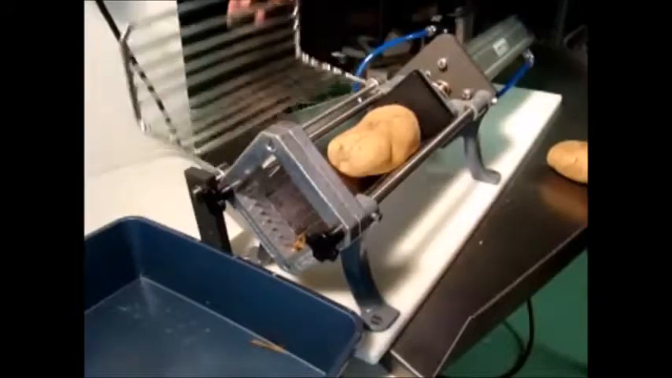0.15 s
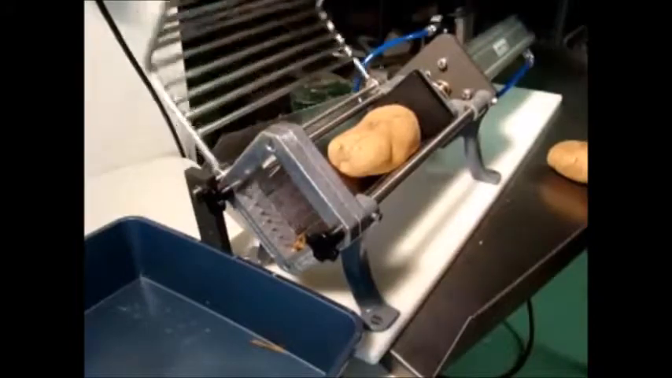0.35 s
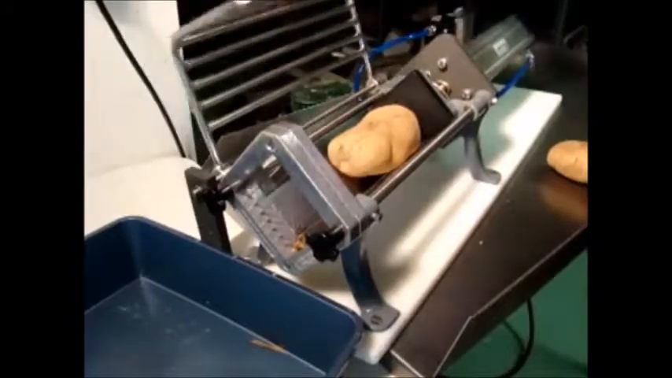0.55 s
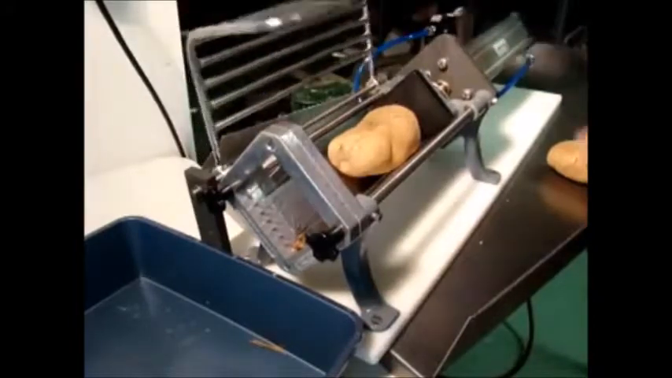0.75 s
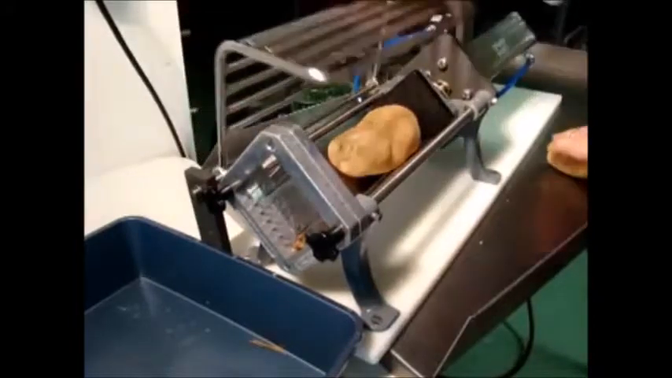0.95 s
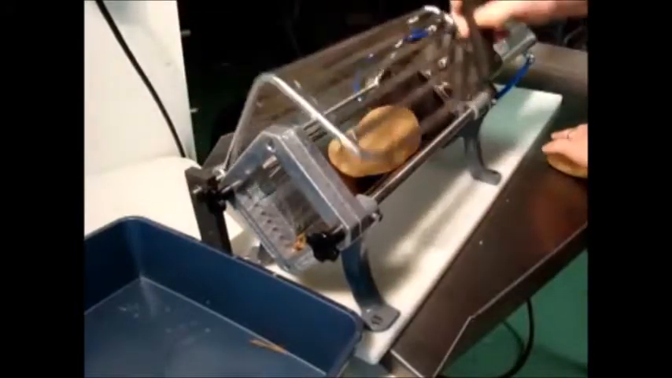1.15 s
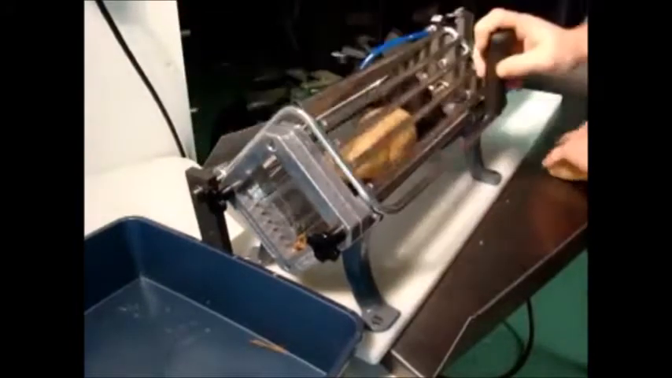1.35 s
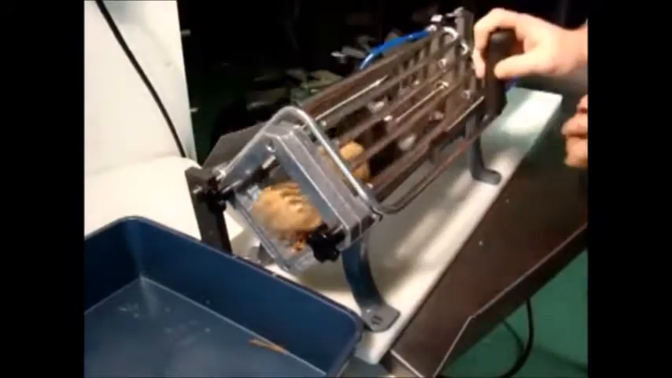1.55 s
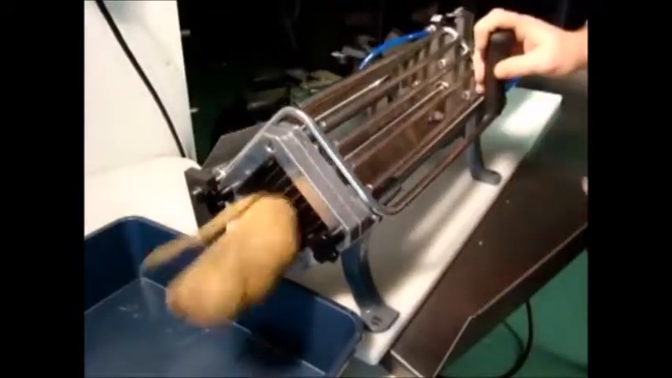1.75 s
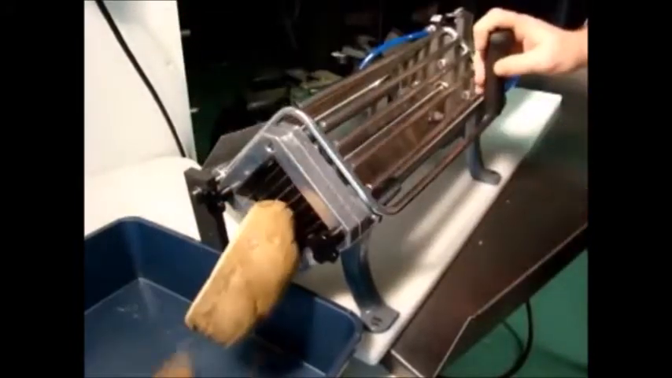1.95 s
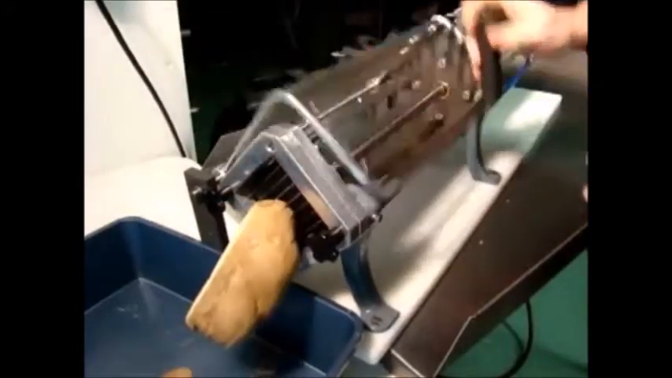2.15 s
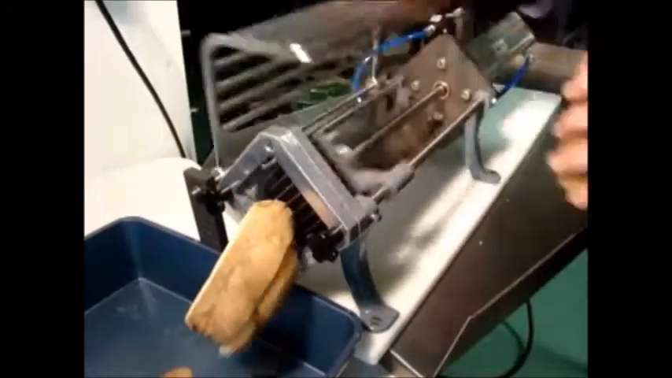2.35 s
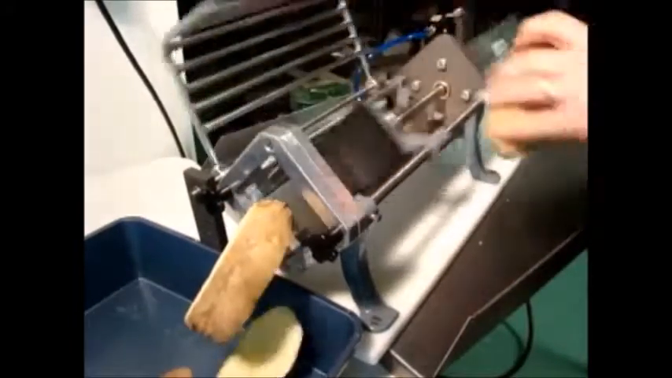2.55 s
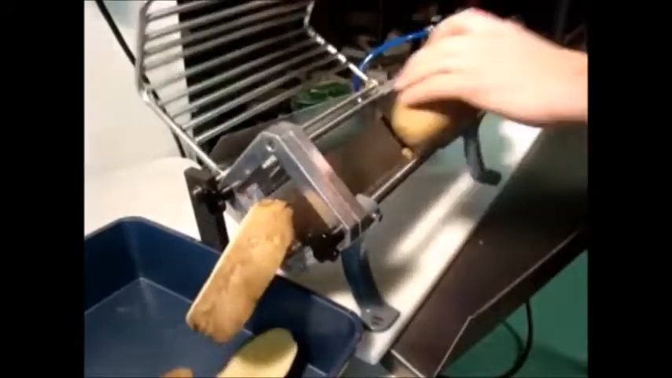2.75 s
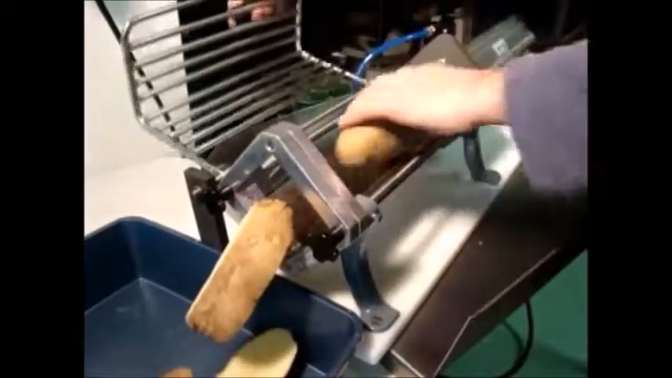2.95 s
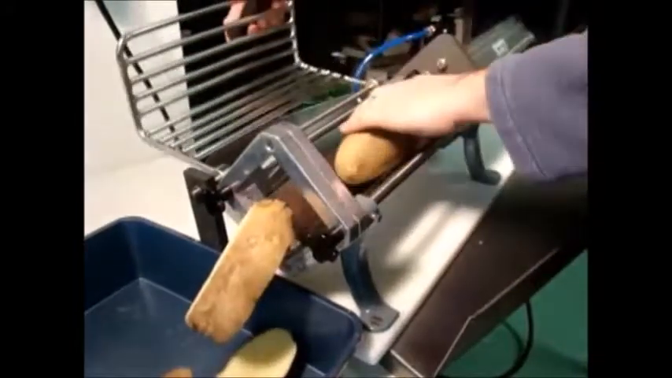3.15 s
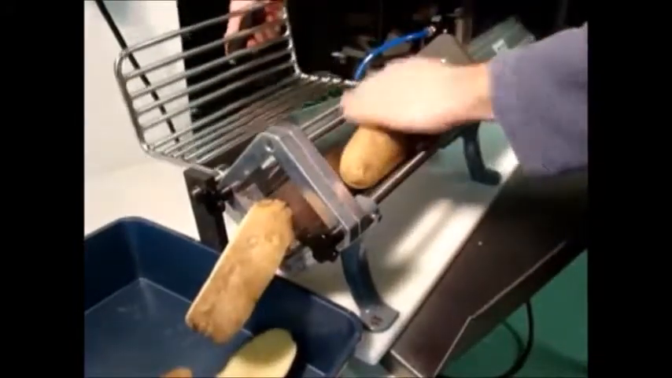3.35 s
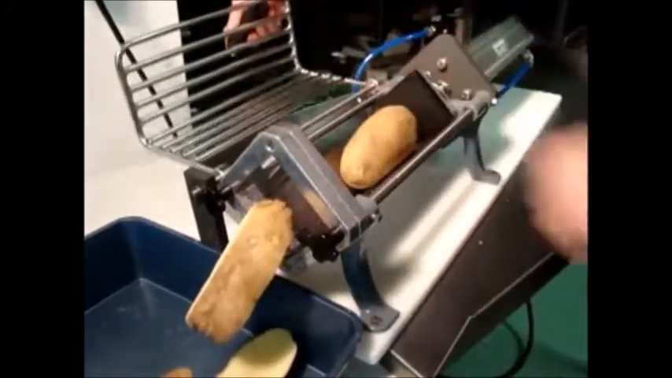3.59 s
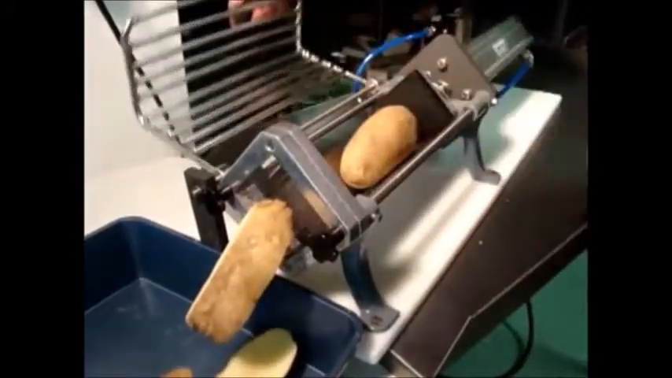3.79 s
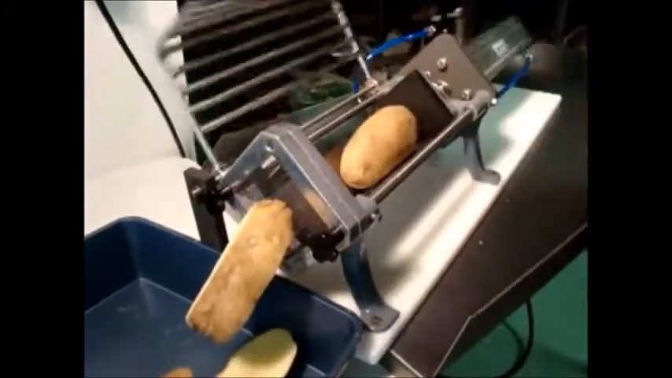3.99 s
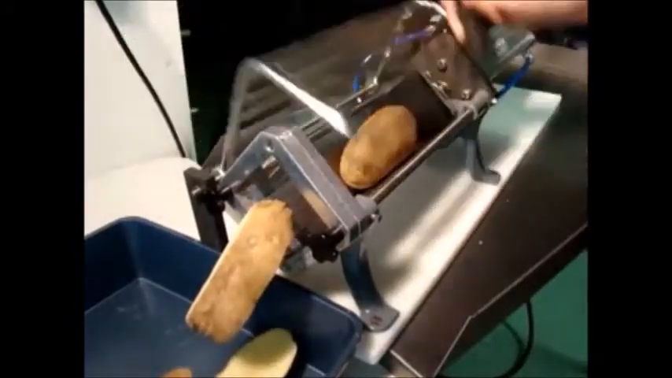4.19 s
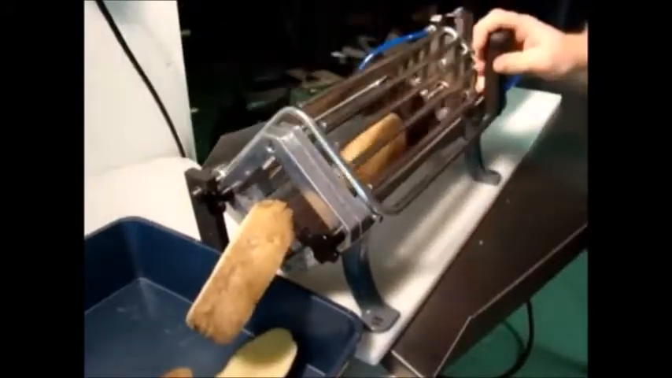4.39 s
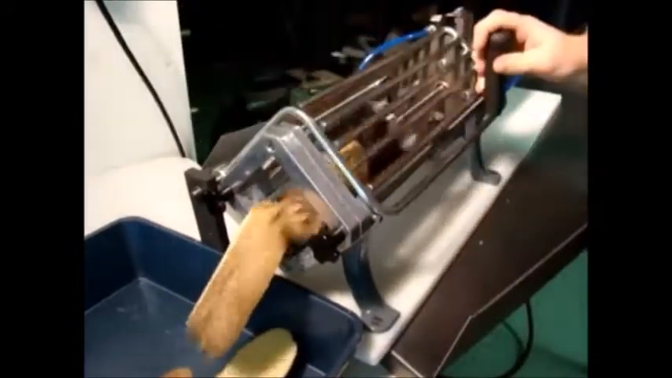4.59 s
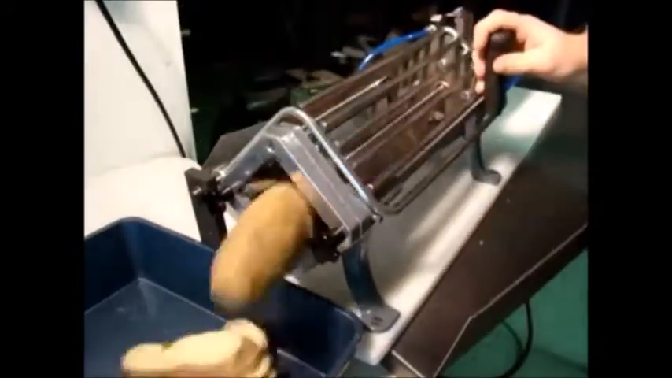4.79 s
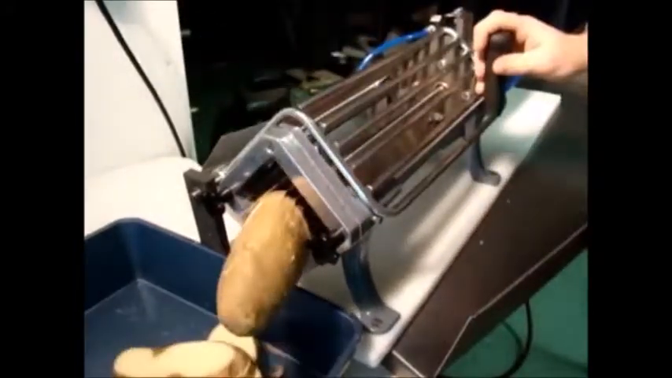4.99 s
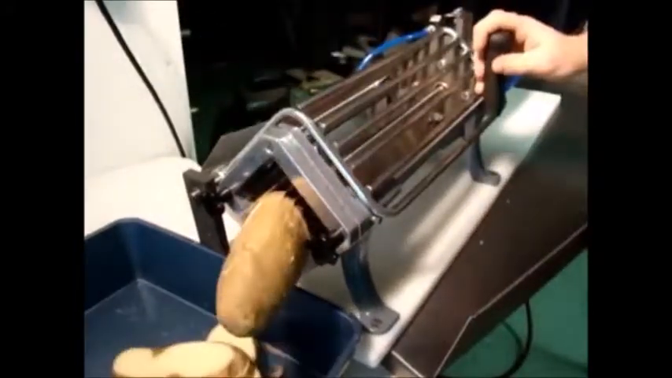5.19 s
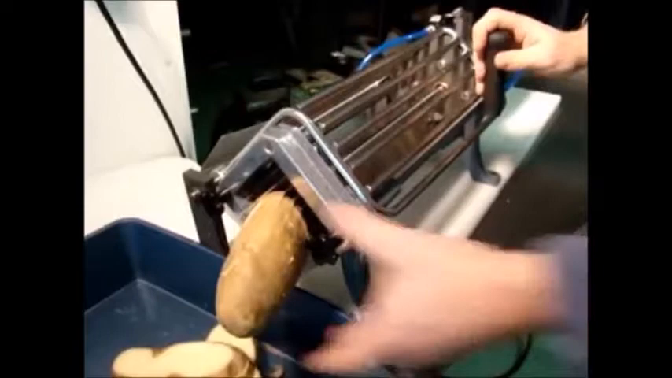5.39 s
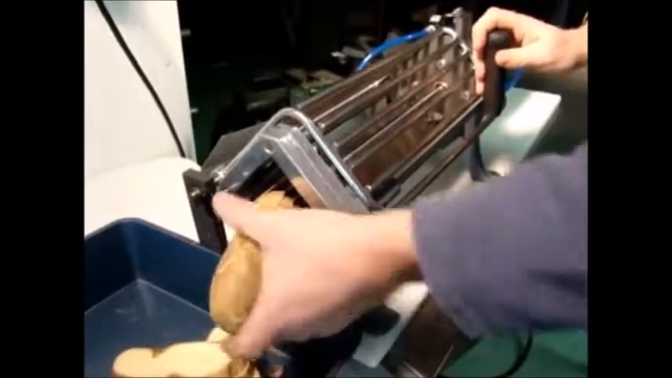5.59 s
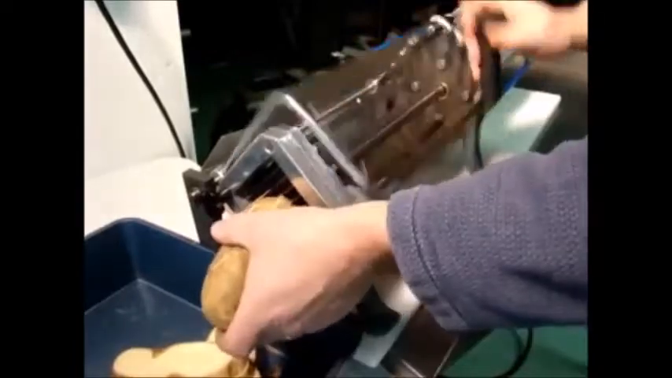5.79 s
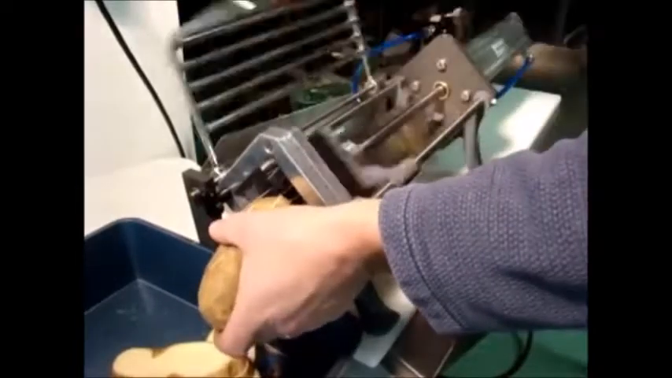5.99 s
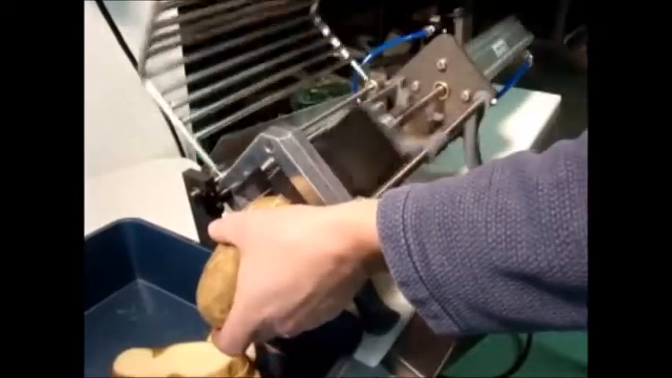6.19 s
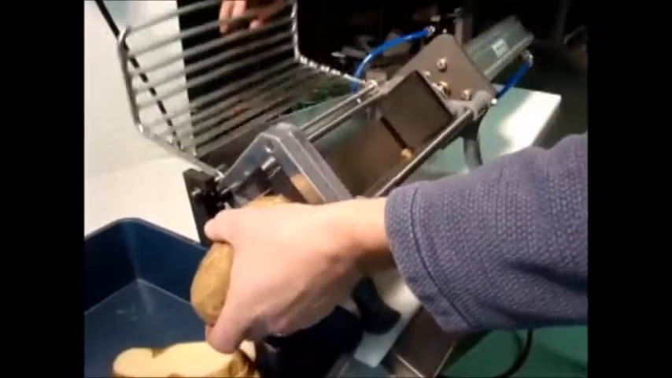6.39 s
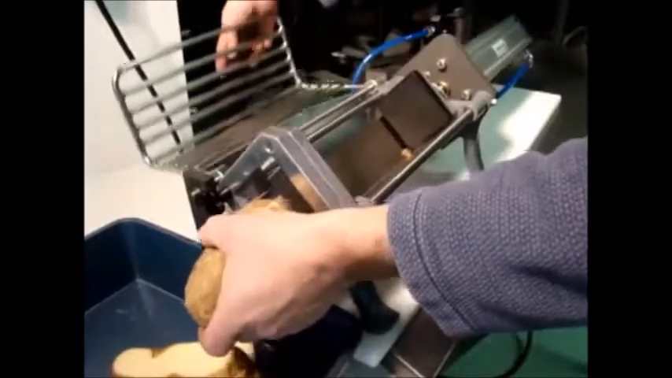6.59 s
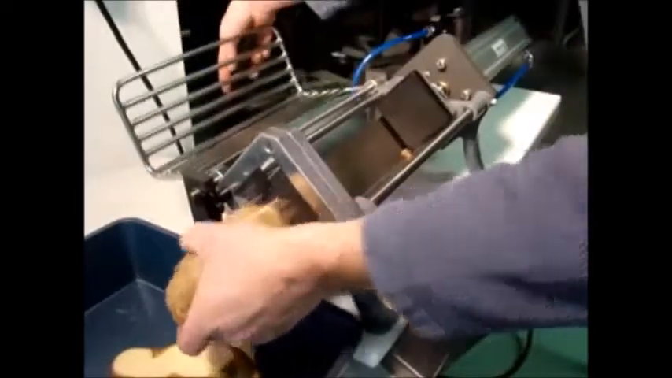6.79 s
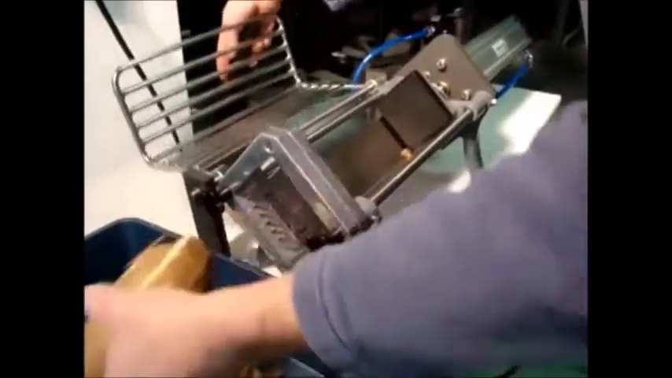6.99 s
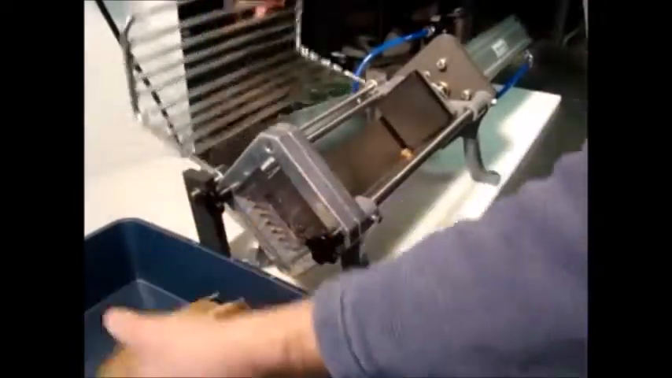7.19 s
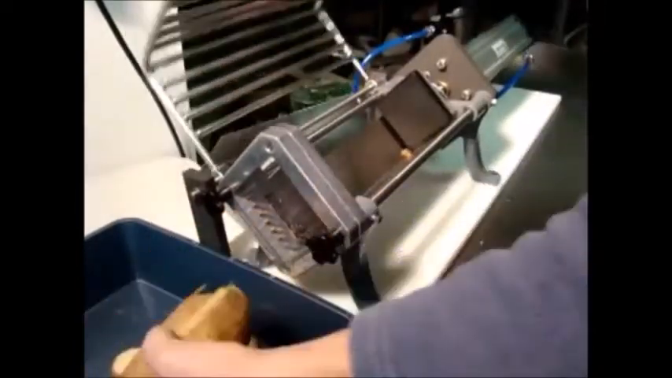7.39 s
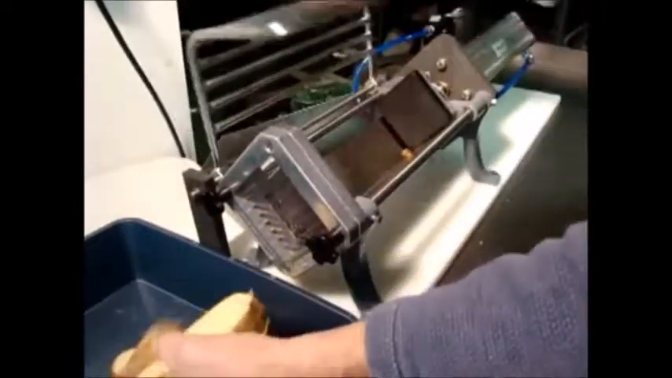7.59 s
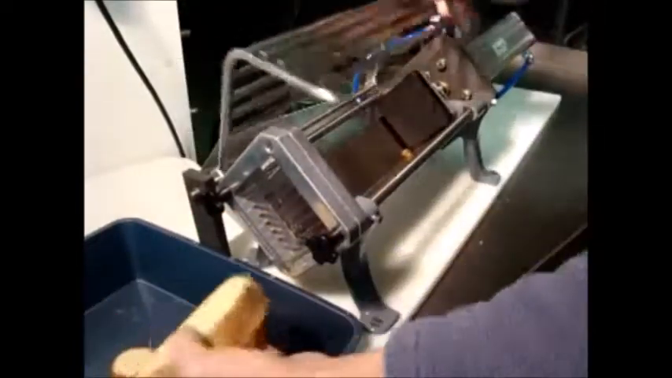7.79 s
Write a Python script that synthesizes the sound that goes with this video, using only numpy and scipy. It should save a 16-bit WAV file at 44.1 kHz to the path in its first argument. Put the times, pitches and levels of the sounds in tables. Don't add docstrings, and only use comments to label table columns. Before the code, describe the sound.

A hard-walled workshop with low ventilation hum and faint motor whine, heard close on one slightly overloaded microphone with no extreme treble. Soft brushing and potato bumps open it. At 1.3 s the wire guard claps shut with a quick rattling bounce. At 1.47 s a valve pops and a loud, harsh air jet surges, with a potato knock at 1.53; a steel end stop cracks at 2.0 as the air cuts off. Pieces thud and rattle into a tray, with a tiny high whistle at 2.2. A brighter return hiss runs 2.47-2.97, ending in a hard clack, then whistle and dying leak. Quiet handling until a sharper guard clap at 4.42; the second outward blast runs 4.5-5.03 with a heavy knife blow at 4.55. Faint wire squeaks follow at 5.2-6.05. The last return jet runs 6.06-6.58 and slams; echo fades into leak, dull bumps and a light metallic rattle at 7.8.

```python
import sys
import numpy as np
from scipy import signal
from scipy.fft import rfft, irfft, next_fast_len
from scipy.io import wavfile
from scipy.ndimage import uniform_filter1d, minimum_filter1d

SR = 44100
rng = np.random.default_rng(int(sys.argv[2]) if len(sys.argv) > 2 else 0)


def put_to_file(sound):
    columns = np.atleast_2d(sound).T
    safe = np.clip(columns, -1, 1)
    whole_steps = np.round(safe * 32767)
    wavfile.write(sys.argv[1], SR, whole_steps.astype(np.int16))


def elevation(decibels):
    levels = np.asarray(decibels, float)
    return 10 ** (levels / 20)


N = 346087

# opens t/s, shuts t/s, steady flow level/dB, opening surge level/dB, brightness/dB
STROKES = [
    (1.473, 2.014, -15, 8.5, -3),
    (2.472, 2.972, -17.5, 3.5, -0.5),
    (4.506, 5.033, -15, 7.5, -3.5),
    (6.063, 6.584, -18, 8.5, -0.5),
]
# t/s, peak level/dB
GUARD_1 = [
    (1.2955, -19.5),
    (1.2995, -16),
    (1.308, -18.5),
    (1.325, -28),
]
GUARD_2 = [
    (4.425, -16),
    (4.4259, -10.5),
    (4.433, -11.5),
]


def rms_one(x):
    return x / np.sqrt(np.mean(x ** 2) + 1e-20)


def at_hz(points, hz):
    points = np.array(points)
    return np.interp(np.log(hz), np.log(points[:, 0]), points[:, 1])


def drift(rate_hz, size):
    settle = SR // 5
    r = np.exp(-2 * np.pi * rate_hz / SR)
    wander = signal.lfilter([1], [1, -2 * r, r * r], rng.standard_normal(size + settle))
    return rms_one(wander[settle:])


def coloured(spectrum, size):
    padded = next_fast_len(size)
    hz = np.maximum(np.fft.rfftfreq(padded, 1 / SR), 1)
    shaped = rfft(rng.standard_normal(padded)) * elevation(at_hz(spectrum, hz))
    return rms_one(irfft(shaped, padded)[:size])


def narrow(hz, width_hz, size):
    r = np.exp(-np.pi * width_hz / SR)
    poles = [1, -2 * r * np.cos(2 * np.pi * hz / SR), r * r]
    return rms_one(signal.lfilter([1, 0, -1], poles, rng.standard_normal(size)))


def band(x, low_hz, high_hz):
    edges_hz = [low_hz, min(high_hz, .45 * SR)]
    return signal.sosfilt(signal.butter(2, edges_hz, "band", fs=SR, output="sos"), x)


def add(out, start_s, piece):
    i = round(start_s * SR)
    out[i:i + len(piece)] += piece[:N - i]


def patchy(x, patchy_db):
    padded = next_fast_len(len(x))
    hz = np.fft.rfftfreq(padded, 1 / SR)
    whole = rfft(x, padded)
    which = np.clip(3 * np.log2(hz / 300 + 1e-9), 0, 15).astype(int)
    out = 0
    for k in range(16):
        part = irfft(whole * (which == k), padded)[:len(x)]
        out = out + part * elevation(patchy_db * drift(13.0, len(x)))
    return rms_one(out)


def puffs(rows, t60_s, spread, rise_s, body):
    out = np.zeros(N)
    t = np.arange(SR // 3) / SR
    for start_s, peak_db, hz, *own_t60_s in rows:
        puff = band(rng.standard_normal(len(t)), hz / spread, hz * spread)
        puff = rms_one(band(puff, hz / spread ** 2, hz * 4))
        puff += body * np.sin(2 * np.pi * hz * t)
        puff *= elevation(-60 * t / (own_t60_s or [t60_s])[0]) * np.clip(t / rise_s, 0, 1)
        add(out, start_s, elevation(peak_db) * puff / np.abs(puff).max())
    return out


def struck(hits, modes, crack, contact_s, crack_db):
    out = np.zeros(N)
    t = np.arange(SR // 2) / SR
    rise = np.clip(t / 0.00064, 0, 1)
    for start_s, peak_db in hits:
        piece = elevation(crack_db) * coloured(crack, len(t)) * np.exp(-t / contact_s)
        for (hz, level_db, t60_s), turn in zip(modes, rng.random(len(modes))):
            piece += elevation(level_db - 60 * t / t60_s) * np.sin(2 * np.pi * (hz * t + turn))
        add(out, start_s, elevation(peak_db) * rise * piece)
    return out


def hum():
    # t/s, level/dB
    hum_level = [(0, -36), (.3, -51), (1.25, -48.5), (3.4, -58), (3.8, -58), (4.06, -52), (6.0, -55.5),
                 (7.2, -59), (7.7, -50.5), (7.85, -46.5)]
    # f/Hz, density/(dB per Hz)
    hum_colour = [(18, -53), (30, -33), (92, -20.5), (185, -5), (316, -2.5), (489, -0.5), (1090, -3.5),
                  (1260, -2), (1600, -3.5), (2040, -6), (2370, -5.5), (4780, -12.5), (9900, -14),
                  (12900, -48), (21800, -120)]
    # f/Hz, level/dB
    whine_lines = [(1200, -25), (1440, -24), (1560, -18)]
    rumble_db, rumble_hz = -21, 120
    air = patchy(coloured(hum_colour, N), patchy_db=1.3)
    air += sum(elevation(line_db) * narrow(hz, 12, N) for hz, line_db in whine_lines)
    knot_s, knot_db = np.transpose(hum_level)
    level_db = np.interp(np.arange(N) / SR, knot_s, knot_db)
    low_pass = signal.butter(2, rumble_hz, fs=SR, output="sos")
    rumble = rms_one(signal.sosfilt(low_pass, rng.standard_normal(N)))
    return air * elevation(level_db) + elevation(rumble_db + np.minimum(level_db, -51)) * rumble


def workshop(x):
    # f/Hz, t60/s
    room_t60 = [(150, 0.44), (600, 0.88), (1500, 1), (4000, 0.93), (7000, 0.66), (10000, 0.39)]
    # f/Hz, level/dB
    room_colour = [(150, 11.5), (500, 7), (900, -1), (1400, 4), (2500, 0), (4500, -1.5), (9000, -1.5)]
    t = np.arange(int(1.5 * SR)) / SR
    edges_hz = 80 * 2 ** np.arange(0, 7.6, .5)
    tail = np.zeros(len(t))
    for low_hz, high_hz in zip(edges_hz, edges_hz[1:]):
        mid_hz = np.sqrt(low_hz * high_hz)
        fade_db = at_hz(room_colour, mid_hz) - 60 * t / at_hz(room_t60, mid_hz)
        tail += band(rng.standard_normal(len(t)), low_hz, high_hz) * elevation(fade_db)
    tail *= np.clip(t / 0.014, 0, 1)
    return signal.fftconvolve(x, tail / np.sqrt(np.sum(tail ** 2)))[:N]


def handling():
    # t/s, peak level/dB, centre f/Hz
    drops = [(.335, -41, 910), (.403, -40, 900), (.458, -38, 670), (.67, -44, 590), (1.529, -10, 1116),
             (4.548, -12.5, 1085), (2.14, -20, 910), (2.175, -19.5, 644), (2.191, -19.5, 1290),
             (2.385, -31, 1510), (2.712, -18, 663), (4.05, -43, 870), (5.805, -47, 694), (5.945, -43, 750),
             (5.985, -43, 800), (7.44, -49, 800), (7.665, -37, 645)]
    # t/s, peak level/dB, centre f/Hz
    bumps = [(.82, -45, 200), (1.13, -47, 130), (1.18, -42, 88.5), (2.283, -51, 120), (2.317, -53, 120),
             (2.412, -50.5, 120), (3.385, -52, 168), (3.412, -49, 170), (3.445, -51, 171),
             (4.91, -39.5, 140), (5.03, -44, 111), (5.18, -51, 111), (6.035, -48.5, 150)]
    # t/s, peak level/dB, centre f/Hz
    rattles = [
        (2.177, -16.5, 3200),
        (7.803, -31, 3500),
        (7.8175, -21.5, 7060),
        (7.84, -31.5, 2300),
    ]
    # t/s, peak level/dB, centre f/Hz
    brushes = [
        (.005, -32.5, 900),
        (4.04, -42, 5000),
        (7.63, -42.5, 695),
        (7.735, -43.5, 650),
        (7.78, -41, 2500),
    ]
    out = puffs(drops, 0.057, spread=1.7, rise_s=.005, body=1.0)
    out += puffs(bumps, 0.049, spread=1.4, rise_s=.006, body=1.5)
    out += puffs(rattles, 0.028, spread=1.7, rise_s=0.0012, body=0)
    return out + puffs(brushes, .4, spread=2.4, rise_s=.01, body=0)


def wire():
    # t/s, length/s, level/dB
    rubs = [(5.237, .2, -65), (5.55, 0.17, -64), (5.712, 0.12, -49.5), (5.844, 0.054, -54),
            (5.912, 0.079, -51), (5.993, 0.08, -53)]
    wire_hz, edge_s, fade_db = 400, 0.012, 1
    t = np.arange(N) / SR
    tone = np.sqrt(2) * np.sin(2 * np.pi * np.cumsum(wire_hz + 2.9 * drift(9.6, N)) / SR)
    rub = np.zeros(N)
    for start_s, length_s, level_db in rubs:
        since_s = t - start_s
        gate = np.clip(np.minimum(since_s, start_s + length_s - t) / edge_s, 0, 1)
        rub += elevation(level_db - fade_db * np.clip(since_s / length_s, 0, 1)) * gate
    return tone * rub * elevation(1.5 * drift(25, N))


def guard_shuts():
    # f/Hz, level/dB, t60/s
    modes_1 = [(175, -24, 0.29), (426, -13, 0.2), (510, -21, 0.19), (600, -14.5, 0.075), (800, -7.5, 0.047),
               (1170, -8, 0.03), (2960, -13.5, 0.014)]
    modes_2 = [(172, -26, .15), (375, -23, .07), (605, -20, .05), (805, -19, .035), (1100, -12, .03),
               (1660, -16, .025), (2750, -7, .014)]
    # f/Hz, density/(dB per Hz)
    guard_crack = [(100, -47), (250, -17.5), (700, -6.5), (1500, -11), (2800, -15), (3600, -19),
                   (7000, -28.5), (11000, -32)]
    out = struck(GUARD_1, modes_1, guard_crack, contact_s=0.0047, crack_db=-3.5)
    return out + struck(GUARD_2, modes_2, guard_crack, contact_s=0.0084, crack_db=-5.0)


def whistles():
    # t/s, length/s, whistle level/dB, leak level/dB
    closings = [
        (2.209, .038, -29.5, -43),
        (3.148, .04, -31, -44),
        (5.229, .044, -31, -43),
        (6.762, .04, -41, -46),
    ]
    # delay t/s, f/Hz, share of length/1, whistle level/dB, leak or ring level/dB
    seats = [
        (-.105, 8670, .7, -6, -18),
        (0, 6800, 1, 0, 2),
        (.1, 4950, .5, -40, -12),
        (-.18, 1500, .5, -60, 4),
        (-.18, 4050, .5, -60, 1),
    ]
    out = np.zeros(N)
    t = np.arange(SR // 2) / SR
    for start_s, whole_s, peep_db, leak_db in closings:
        for delay_s, hz, share, seat_db, seat_leak_db in seats:
            length_s = whole_s * share
            pitch_hz = hz * (1 - .5 * np.minimum(t, length_s)) + 110 * drift(150, len(t))
            tone = np.sqrt(2) * np.sin(2 * np.pi * np.cumsum(pitch_hz) / SR)
            tone *= elevation(1.6 * drift(120, len(t)))
            gate = np.clip(t / 0.017, 0, 1) * np.clip((length_s - t) / 0.0033, 0, 1)
            fade_db = leak_db + seat_leak_db - 62 * t + 2.0 * drift(15, len(t))
            leak = narrow(hz * .985, .045 * hz, len(t)) * elevation(fade_db)
            add(out, start_s + delay_s, elevation(peep_db + seat_db) * gate * tone + leak)
    return out


def pusher_hits():
    # t/s, peak level/dB
    knocks = [
        (1.5295, -4.5),
        (4.547, -12),
        (4.555, 3),
        (4.9945, -13),
    ]
    # t/s, peak level/dB, bounce liveliness/dB
    end_stops = [
        (1.9966, 2.5, -23),
        (2.954, 5.5, 5.3),
        (5.018, -3, -13),
        (6.5692, 6.5, -1),
    ]
    # delay t/s, level/dB
    bounces = [
        (.0045, -24),
        (0.0116, -15.5),
    ]
    # f/Hz, level/dB, t60/s
    stop_modes = [(1571, -15, 0.03), (2050, -18, 0.027), (3120, -27, 0.014), (3910, -14, .015),
                  (6030, -18, .01)]
    # f/Hz, density/(dB per Hz)
    stop_crack = [(100, -50), (600, -26), (1400, -6.5), (2200, -3), (4000, -4), (6100, -3), (7500, -9.5),
                  (11000, -25)]
    hits = knocks + [row[:2] for row in end_stops]
    for start_s, peak_db, lively_db in end_stops:
        hits += [(start_s + delay_s, peak_db + loss_db + lively_db) for delay_s, loss_db in bounces]
    ring = struck(hits, stop_modes, stop_crack, contact_s=0.0019, crack_db=-3.0)
    clicks = np.zeros(N)
    for start_s, peak_db in hits:
        add(clicks, start_s, elevation(np.array([peak_db])))
    return band(ring, 460, 15000), band(clicks, 1300, 7100)


def valve_pops():
    # t/s, peak level/dB, centre f/Hz, t60/s
    pop_rows = [
        (1.477, -1.5, 2760, 0.16),
        (2.476, -17, 8360, 0.14),
        (4.509, -10, 2140, 0.058),
        (6.066, -8.5, 3040, 0.027),
    ]
    return puffs(pop_rows, None, spread=1.61, rise_s=0.0022, body=0)


def jet():
    # f/Hz, density/(dB per Hz)
    jet_out = [(88, -53), (150, -36.5), (254, -32), (429, -17.5), (702, -14), (897, -6), (1370, -9.5),
               (1910, -5), (2480, -4), (8160, 4), (9900, 6.5), (12900, -63), (21800, -120)]
    jet_back = [(88, -56), (150, -41), (610, -10), (1170, -9.5), (1370, -11), (1870, -6), (3520, -9),
                (3840, -3.5), (4740, -5.5), (8600, 2), (9900, 2), (12900, -42), (21800, -120)]
    # f/Hz, width f/Hz, out level/dB, back level/dB
    ports = [(1897, 85, -19, -27), (2790, 90, -26, -32), (3430, 70, -25, -30), (4120, 70, -26, -31),
             (7510, 90, -27, -30), (8760, 160, -26, -15)]
    sing_db = 5
    port_wet_db = -12
    open_s, open_from_db = .008, -14
    surge_s = 0.048
    surge_dull_db, end_dull_db, end_s = 0.5, 2.5, 0.074
    out = np.zeros((2, N))
    for k, (start_s, end_s_abs, flow_db, surge_db, bright_db) in enumerate(STROKES):
        back = k % 2
        t = np.arange(0, end_s_abs - start_s, 1 / SR)
        left_s = t[-1] - t
        air = patchy(coloured((jet_out, jet_back)[back], len(t)), patchy_db=1.5)
        song = np.zeros(len(t))
        for hz, width_hz, *levels_db in ports:
            swell_db = 2.6 * drift(11.0, len(t)) + sing_db * t / t[-1]
            song += elevation(levels_db[back]) * narrow(hz, width_hz, len(t)) * elevation(swell_db)
        air = air + elevation(np.array([[0], [port_wet_db]])) * song
        lows = signal.lfilter(*signal.butter(1, 2500, fs=SR), air)
        surge = np.exp(-np.maximum(t - open_s, 0) / surge_s)
        tilt_db = bright_db - surge_dull_db * surge ** 2
        tilt_db -= end_dull_db * np.clip(1 - left_s / end_s, 0, 1)
        air = lows * elevation(-tilt_db) + (air - lows) * elevation(tilt_db)
        valve = np.clip(t / 0.0018, 0, 1) * np.clip(left_s / 0.007, 0, 1)
        level_db = flow_db + surge_db * surge + open_from_db * np.clip(1 - t / open_s, 0, 1)
        air = air * valve * elevation(level_db - 1.66 + 0.57 * drift(60, len(t)))
        add(out[0], start_s, air[0])
        add(out[1], start_s, air[1])
    return out


def scene():
    hands = handling()
    guard = guard_shuts()
    stops, clicks = pusher_hits()
    pops = valve_pops()
    air, air_at_walls = jet()
    at_walls = air_at_walls + pops + elevation(13.5) * clicks + elevation(-5.5) * guard + elevation(-6.5) * hands
    close = air + pops + stops + guard + hands + elevation(-7) * workshop(at_walls) + whistles() + wire()
    close = .8 * np.tanh(close / .8)
    close = signal.sosfilt(signal.butter(2, 104, "high", fs=SR, output="sos"), close)
    return np.tile(close + hum(), (2, 1))


def gap_times():
    # t/s, length/s, from f/Hz
    before_onsets = [
        (1.44, .028, 2300),
        (2.45, .022, 3300),
        (4.396, .025, 900),
        (4.497, .008, 4200),
        (6.049, .012, 1400),
        (7.826, .022, 5200),
    ]
    # t/s, from f/Hz
    lone_gaps = [(1.08, 700), (1.27, 3000), (2.85, 800), (3.27, 5000), (5.148, 3000), (6.19, 800),
                 (6.49, 500), (6.69, 1000), (7.385, 2500), (7.705, 2500), (7.79, 2500)]
    rows = [(start_s, length_s, hz, .07, 400) for start_s, length_s, hz in before_onsets]
    rows += [(start_s, .022, hz, .65, 115) for start_s, hz in lone_gaps]
    rows += [(row[1] - .001, .012, 4700, .4, 170) for row in STROKES]
    return rows + [(hits[0][0] + .019, .018, 2800, .5, 220) for hits in (GUARD_1, GUARD_2)]


def spectral_gaps(x):
    speckle_share, speckle_hz = .07, 4600
    hz, frame_s, cells = signal.stft(x, SR, nperseg=256)
    holes = rng.random((len(hz) // 3 + 1, len(frame_s) // 2 + 1)) < speckle_share
    holes = np.repeat(np.repeat(holes, 3, axis=0), 2, axis=1)[:len(hz), :len(frame_s)]
    holes = holes & (hz > speckle_hz)[:, None]
    out = signal.istft(cells * (1 - .9 * holes), SR, nperseg=256)[1][:N]
    for start_s, length_s, from_hz, kept, width_hz in gap_times():
        i = round((start_s - .004) * SR)
        size = min(round((length_s + .008) * SR), N - i)
        hz = np.fft.rfftfreq(size, 1 / SR)
        emptied = (rng.random(200) > kept)[(hz / width_hz).astype(int)] & (hz > from_hz)
        lost = irfft(rfft(out[i:i + size]) * emptied, size)
        out[i:i + size] -= signal.windows.tukey(size, .3) * lost
    return out


def top_cut(x):
    return signal.sosfilt(signal.butter(12, 10780, fs=SR, output="sos"), x)


def record(dry):
    hiss_db, cutoff_hz, limit = -57.5, 10150, .9
    hiss = rms_one(band(rng.standard_normal(N), 2600, 12000))
    x = spectral_gaps(dry[0] + elevation(hiss_db) * hiss)
    x = signal.sosfilt(signal.ellip(12, .5, 65, cutoff_hz, fs=SR, output="sos"), x)
    gain = minimum_filter1d(limit / np.maximum(np.abs(x), limit), size=129)
    x = x * uniform_filter1d(gain, size=129)
    return top_cut(np.tile(x, (2, 1)))


dry = scene()
out = record(dry)
put_to_file(out)
```